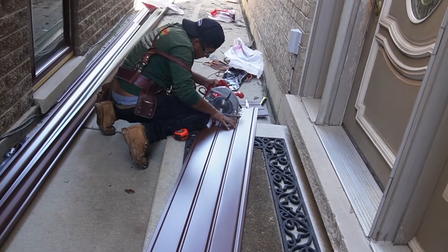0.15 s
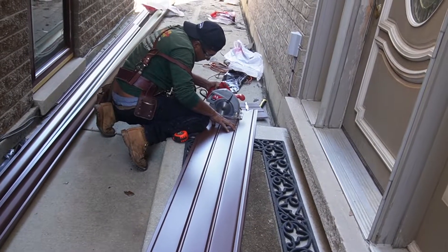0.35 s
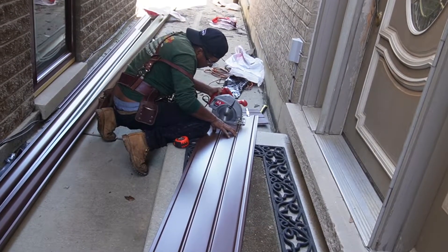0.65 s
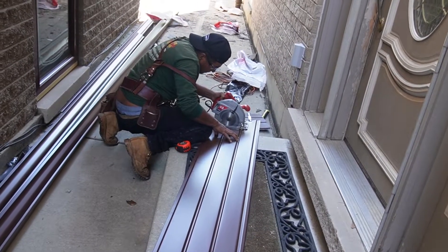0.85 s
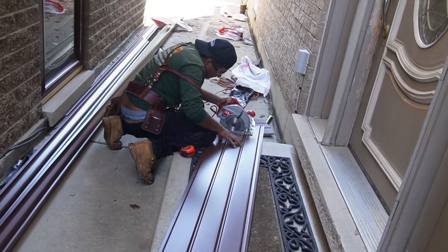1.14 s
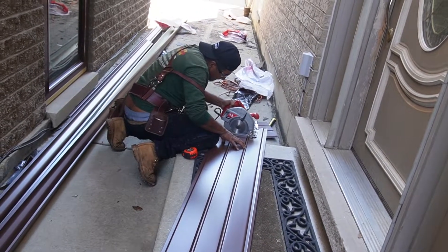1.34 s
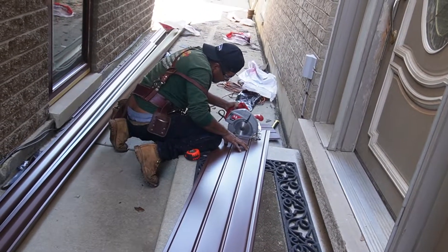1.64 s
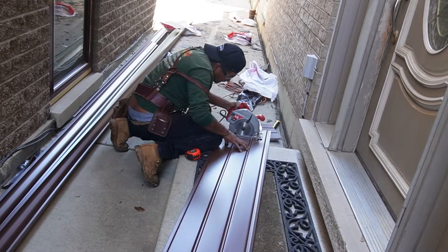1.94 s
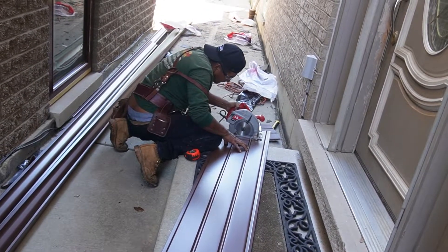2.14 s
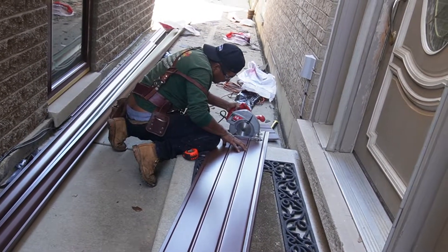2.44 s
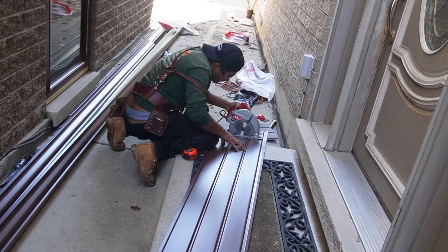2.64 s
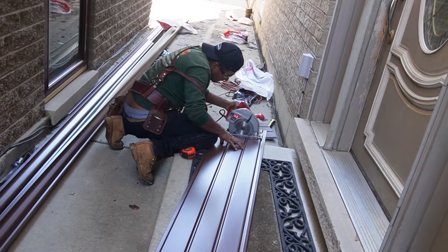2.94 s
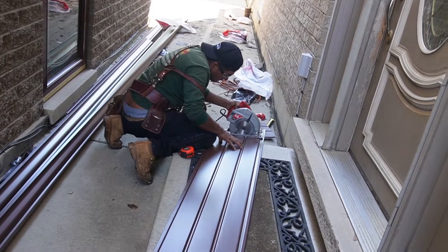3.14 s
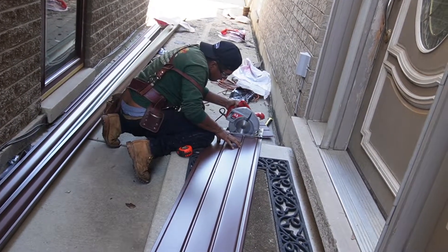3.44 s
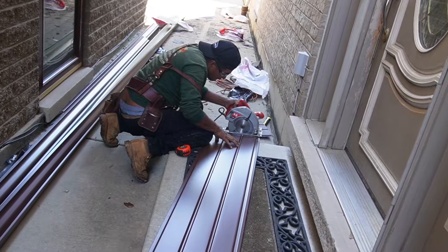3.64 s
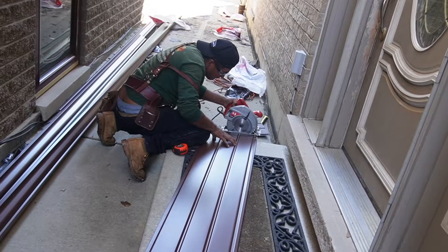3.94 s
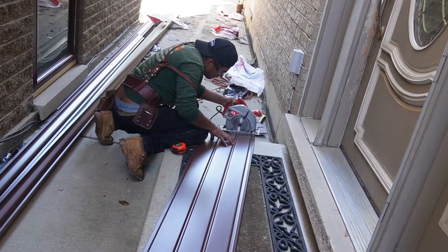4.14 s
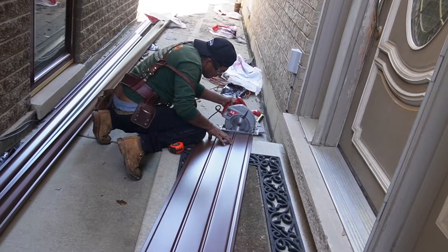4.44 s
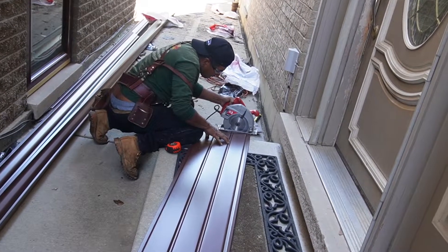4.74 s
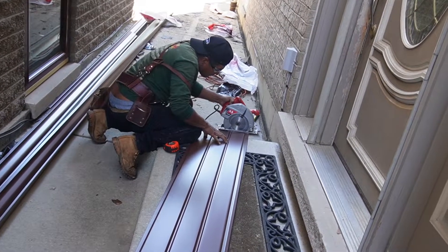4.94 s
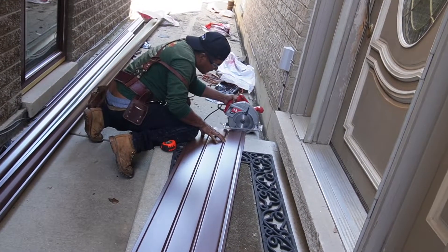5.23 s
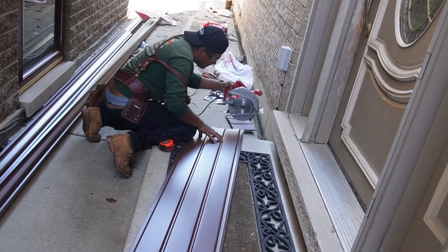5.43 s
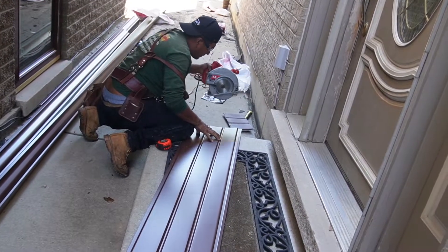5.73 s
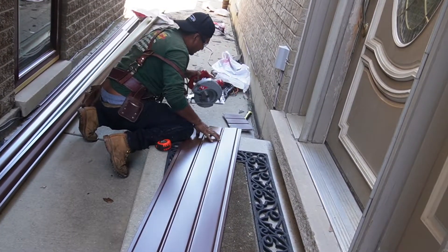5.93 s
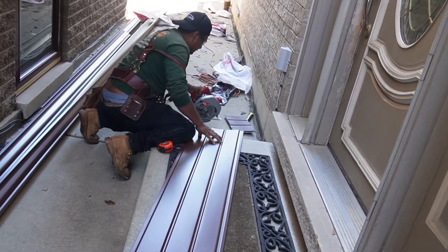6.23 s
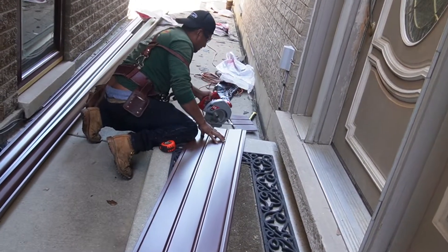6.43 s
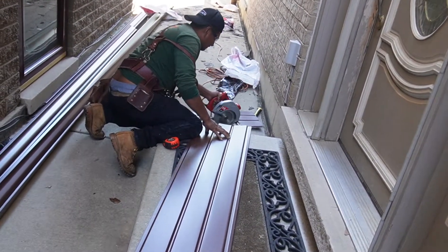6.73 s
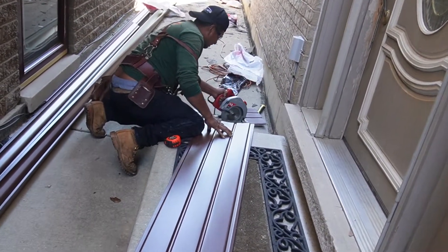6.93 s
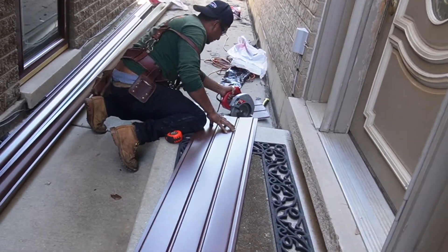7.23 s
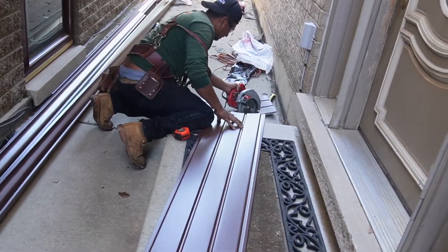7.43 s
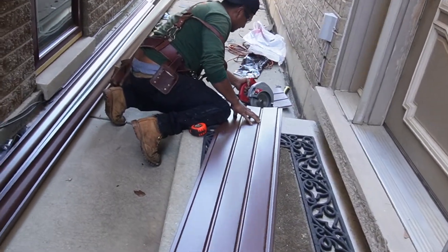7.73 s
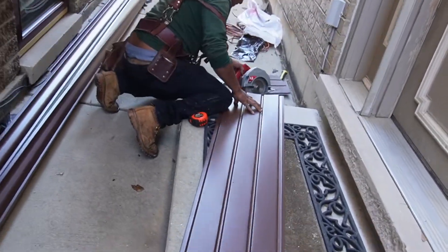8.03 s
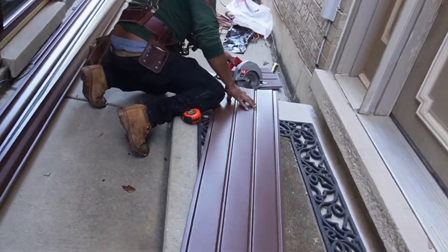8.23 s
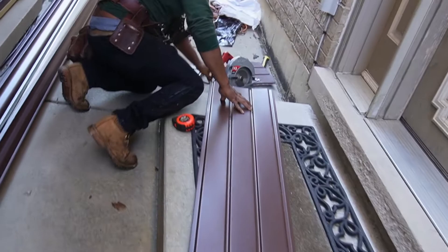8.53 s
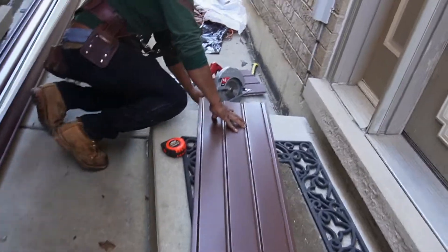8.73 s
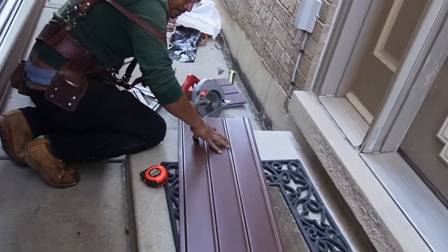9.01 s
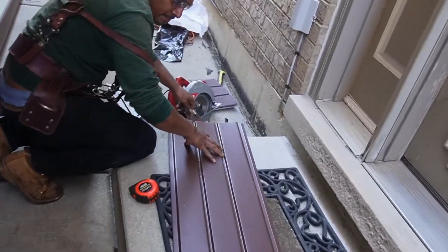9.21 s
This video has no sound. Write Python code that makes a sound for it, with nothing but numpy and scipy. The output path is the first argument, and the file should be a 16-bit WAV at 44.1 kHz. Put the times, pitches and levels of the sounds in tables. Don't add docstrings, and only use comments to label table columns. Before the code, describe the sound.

Close by, between hard brick walls outdoors, a handheld circular saw cuts thin ribbed metal with a piercing whine, bright gritty rasp and wavering squeals. Sharp ticks and rattling slaps cluster midway, and the pitch sags under load. After about five seconds the cut ends and the whine glides smoothly down over rushing fan air, with dull knocks on concrete and small bright clinks.

```python
import sys
import numpy as np
from scipy import signal
from scipy.io import wavfile
from scipy.ndimage import uniform_filter1d

SR = 44100
rng = np.random.default_rng(int(sys.argv[2]) if len(sys.argv) > 2 else 0)


def unload_audio(sound):
    columns = np.transpose(np.atleast_2d(sound))
    steps = np.round(np.clip(columns, -1, 1) * 32767)
    wavfile.write(sys.argv[1], SR, steps.astype(np.int16))


def natural_amplitude(level_db):
    exponent = np.asarray(level_db, float) / 20
    return 10 ** exponent


N = 413207

# [time_s, tooth_rate_hz]
BLADE_SPEED = [(0.0, 4715), (0.1, 4765), (0.7, 4808), (1.6, 4857), (1.95, 4848), (2.3, 4720), (2.45, 4599),
               (2.8, 4592), (3.1, 4442), (3.46, 4400), (3.75, 4565), (4.1, 4662), (4.5, 4657), (4.75, 4627),
               (5.09, 4637), (5.37, 4831)]
# [time_s, tooth_line_db, roughness_0_to_1]
TOOTH_BITE = [(0, -20, 0.7), (.75, -31, 0.8), (1, -23.5, 0.4), (1.9, -18.5, 0.1), (2.25, -15.5, 0.25),
              (2.5, -26.5, .85), (2.65, -16.5, 0.4), (2.95, -32.5, 1.1), (3.09, -14, .7), (3.3, -28, 1.07),
              (3.42, -22, 1), (3.55, -22, 1.1), (3.75, -18.5, 1.04), (4.25, -29, 1.1), (4.42, -20, 1),
              (4.8, -17.5, 0.65), (5, -18.5, 0.9), (5.2, -19, 0.7)]
# [time_s, ratio]
FAN_PULL = [(0, 1.007), (2.3, 1.007), (3.05, 1.011), (3.35, 1.019), (3.65, 1.013), (4, 1.01), (4.4, 1.001),
            (5.05, 1.003), (5.2, 1.007)]
# [time_s, level_db]
FAN_LEVEL = [(0, -20), (.25, -29), (1.42, -25.5), (1.65, -30), (2.6, -36), (3.07, -27), (3.2, -36),
             (3.4, -26), (3.55, -35), (4.7, -31), (5.12, -34), (5.33, -20), (5.68, -25), (6.0, -17.5),
             (7.7, -21), (8.83, -13.5), (8.98, -25), (9.25, -17)]
# [cycles_per_turn, start_s, stop_s]
WOBBLES = [(3, .3, 1), (3, 1.65, 2.3), (6, 0, 2.3), (4, 2.6, 3.65), (1, 2.4, 3.6), (4, 4.2, 4.8),
           (8, 1.7, 5), (4.7, 0, .9)]
WOBBLE_LEVELS = [-56, -50, -51, -45.5, -61, -53, -51.5, -50]
# [pitch_hz, start_s, stop_s,
# once_a_turn_share_0_to_1]
SQUEAL_MODES = [(8660, 0, 2.3, .2), (8830, 0, 1.9, .5), (8860, 3.4, 4.6, .5), (13200, .4, 1.4, .6),
                (4400, .4, 1.9, .9), (2800, 0, .8, .3), (3720, 3.42, 3.6, .3), (1150, 4.86, 4.97, .3),
                (510, 4.85, 4.92, .3), (1380, 8.85, 9.2, .8), (1450, 5.38, 5.46, .3), (15200, 6.3, 8, .5),
                (2250, 7.3, 8.3, .6), (3750, 7.6, 9.37, .6), (5550, 8.6, 9.37, .5), (960, 7.5, 9.1, .5),
                (1980, .5, 1.4, .7), (7450, 4.4, 4.95, .3), (6150, 3.9, 4.45, .3), (5250, .2, 1.3, .6)]
SQUEAL_LEVELS = [-40, -32.5, -27.5, -33, -33, -32, -27, -34, -42, -29.5, -31, -41, -29, -33, -39, -35.5,
                 -34, -38, -37, -38]
# [time_s, rasp_db]
RASP_LEVEL = [(0, -19), (.2, -17.5), (1.24, -16), (1.5, -22.5), (1.67, -18), (2.15, -20.5),
              (2.45, -17.5), (2.76, -24), (2.9, -18), (3.0, -23.5), (3.07, -18.5), (3.7, -19),
              (4.02, -16), (4.37, -16.5), (4.69, -21.5), (4.92, -18), (5.2, -22), (5.3, -42)]
# [pitch_hz, density_db_per_hz]
RASP_SPECTRUM = [(24, -69), (40, -54), (171, -18), (312, -11.5), (354, -25), (402, -7.5), (556, -13.5),
                 (680, -2.5), (2050, -3), (2630, -6.5), (4680, -2), (7930, -4), (9450, -1.5), (16000, -6.5)]
# [pitch_hz, width_hz, level_db]
SHEET_RINGS = [(386, 22, -5), (1980, 1550, -30), (2900, 25, 11), (3200, 320, 3), (3660, 500, 3),
               (4090, 620, -3), (4900, 32, -10), (6580, 67, -14)]
# [start_s, peak_db, centre_hz, t60_s]
GROUND_KNOCKS = [(0.009, -19, 385, 0.39), (1.077, -21.5, 325, 0.42), (3.713, -22.5, 331, 0.37),
                 (4.116, -19, 326, 0.25), (4.536, -18.5, 300, 0.12), (5.027, -19, 433, 0.076),
                 (5.078, -28, 400, 0.083), (6.417, -29.5, 250, 0.89), (7.707, -24, 270, 0.3),
                 (8.223, -19.5, 294, 0.53), (8.769, -18.5, 299, 0.54), (9.268, -23, 159, 0.38),
                 (9.33, -12.5, 473, 0.2)]
# [start_s, peak_db]
SHEET_TICKS = [(1.388, -8), (1.429, -19), (1.516, -10), (1.574, -6), (2.291, 1), (2.419, -1.5),
               (2.543, -17), (2.638, -4), (2.758, -5), (2.787, -5), (2.816, -3.5), (3.193, -6),
               (4.538, -10)]
# [start_s, peak_db]
BRIGHT_CHIPS = [
    (5.4335, -20),
    (8.104, -13),
    (8.2252, -17),
    (9.0694, -18),
]
# [start_s, stop_s, level_db]
CHATTER_RUNS = [
    (1.36, 1.391, -29),
    (1.437, 1.59, -34.5),
    (2.3, 2.381, -29.5),
    (2.458, 2.525, -21.5),
    (2.638, 2.76, -20.5),
    (2.838, 3.008, -15),
    (3.186, 3.36, -26),
    (3.44, 3.555, -32.5),
    (4.531, 4.578, -37),
]
# [pitch_hz, density_db_per_hz]
FAST_SPECTRUM = [(24, -69), (40, -40), (262, -18.5), (329, -23), (455, -18.5), (810, -3), (1180, -9.5),
                 (1480, -3), (1720, -5), (3650, 1), (7000, -5), (8550, -8.5), (16000, -14.5)]
# [pitch_hz, density_db_per_hz]
SLOW_SPECTRUM = [(24, -55), (40, -20.5), (556, -12.5), (770, -15.5), (942, -13.5), (1210, -11),
                 (2150, -2.5), (2700, -5), (3650, -3), (6490, -9.5), (8130, -15), (14500, -20.5),
                 (16000, -43)]
# [pitch_hz, width_hz, level_db]
HOUSING_RINGS = [(910, 510, -20), (1390, 90, 53), (2110, 690, 9), (3720, 51, 18), (5750, 27, -13),
                 (6100, 140, 0), (8150, 610, -3), (8820, 690, 37)]
# [pitch_hz, side_minus_mid_db]
STEREO_WIDTH = [(60, -29), (110, -39), (200, -23), (380, -22), (700, -21.5), (1290, -22), (2380, -15),
                (4400, -10.5), (8120, -4), (15000, 0.5)]

TEETH, FAN_VANES = 70, 12
RELEASE_S, FRICTION_HZ_PER_S, AIR_DRAG_HZ, AIR_DRAG_S = 5.37, 511, 994, 1.453
FAN_FADE_DB, BITE_FADE_DB = 2, 1.5
SIZZLE_FOLLOWS, SQUEAL_FOLLOWS, BODY_FOLLOWS = 0.58, 0.57, 0.87
BODY_SHAKEN_DB = 12
DEEP_CUT_S, DEEP_SIZZLE_DB = 3.3, 3.5
CHATTER_EDGE_S = 0.033
ROAR_DB, ROAR_GAIN_DB, HISS_GAIN_DB, LOW_GAIN_DB = -16.5, 4.5, -1.5, -2.5
SET_DOWN_S, SET_DOWN_LOW_DB, SET_DOWN_HISS_DB = 8.98, 9, 5


def rms_one(x):
    return x / np.sqrt(np.mean(x ** 2) + 1e-20)


def in_time(rows):
    s, *columns = np.transpose(rows)
    return [np.interp(np.arange(N) / SR, s, c) for c in columns]


def gate(start, stop, fade):
    return np.interp(np.arange(N) / SR, [start - fade, start, stop, stop + fade], [0, 1, 1, 0])


def at_hz(points, hz):
    points = np.array(points)
    return np.interp(np.log(hz), np.log(points[:, 0]), points[:, 1])


def steep(x, order, hz, kind):
    return signal.sosfilt(signal.butter(order, hz, kind, fs=SR, output="sos"), x)


def drift(rate_hz, span=slice(None)):
    r = np.exp(-2 * np.pi * rate_hz * 40 / SR)
    slow = signal.lfilter([1], [1, -2 * r, r * r], rng.standard_normal(N // 40 + 2002))[2000:]
    return np.interp(np.arange(N)[span] / 40, np.arange(len(slow)), rms_one(slow))


def ringing(x, peaks, boost_db):
    out = x
    for hz, width, db in peaks:
        r = np.exp(-np.pi * width / SR)
        b = np.array([1, 0, -1]) * (1 - r * r) / 2
        a = [1, -2 * r * np.cos(2 * np.pi * hz / SR), r * r]
        out = out + natural_amplitude(boost_db + 0.11 * db) * signal.lfilter(b, a, x)
    return out


def coloured(pair, band_db, patchy_db, span):
    out, together = np.zeros((2, N)), drift(9, span)
    edges = 32 * 2 ** np.arange(0, 9.4, 1 / 3)
    for k, (low, high) in enumerate(zip(edges, edges[1:])):
        mid, side = steep(pair[:, span], 2, [low, high], "band")
        hz = np.sqrt(low * high)
        flicker_db = patchy_db * (0.5 * together + drift(23, span))
        gain = (-1) ** k * natural_amplitude(band_db(hz)[span] + flicker_db)
        out[:, span] += gain * (mid + natural_amplitude(at_hz(STEREO_WIDTH, hz)) * side * [[1], [-1]])
    return out


def between(hz, centres, curves):
    shares = [np.interp(np.log(hz), np.log(centres), row) for row in np.eye(len(centres))]
    return sum((share * c for share, c in zip(shares, curves) if share), np.zeros(N))


def whine(phase, hz, level_db, flutter_db, span=slice(None)):
    gap = np.arctan(natural_amplitude(at_hz(STEREO_WIDTH, hz))) * (1 + 0.65 * drift(24, span))
    size = np.sqrt(2) * natural_amplitude(level_db + flutter_db * drift(38, span)) / np.cos(np.clip(gap, 0, 0.8))
    return size * np.sin(phase[span] + 0.5 * drift(19, span) + gap * [[1], [-1]])


def spell(phase, hz, level_db, flutter_db, start, stop, fade):
    out = np.zeros((2, N))
    span = slice(max(round((start - fade) * SR), 0), round((stop + fade) * SR))
    out[:, span] = gate(start, stop, fade)[span] * whine(phase, hz, level_db, flutter_db, span)
    return out


def shaking():
    return sum(natural_amplitude(db) * gate(start, stop, CHATTER_EDGE_S) ** 2 for start, stop, db in CHATTER_RUNS)


def cutting():
    return gate(0, 5.2, 0.068)


def tooth_rate():
    free_s = np.maximum(np.arange(N) / SR - RELEASE_S, 0)
    lost = FRICTION_HZ_PER_S * free_s + AIR_DRAG_HZ * (1 - np.exp(-free_s / AIR_DRAG_S))
    return uniform_filter1d(in_time(BLADE_SPEED)[0] - lost, size=4000)


def tooth_whine(rate, turns):
    tooth = 2 * np.pi * TEETH * turns
    second_db, rough = in_time(TOOTH_BITE)
    second_db = second_db + BITE_FADE_DB * drift(4.7)
    rough = np.clip(rough, 0, 1)
    run_out = 1 + 0.28 * np.cos(2 * np.pi * turns) + 0.25 * np.cos(4 * np.pi * turns + 1)
    bite = np.sqrt(1 - rough ** 2) * run_out + rough * drift(260)
    out = cutting() * bite * whine(2 * tooth, 2 * rate, second_db - 0.8, flutter_db=-1)
    return out + spell(3 * tooth, 14500, -33, 2, 1.35, 2.24, fade=0.1)


def fan_whine(rate):
    fan = 2 * np.pi * np.cumsum(rate * in_time(FAN_PULL)[0]) / SR
    ragged, coast = drift(260), 1 - cutting()
    out = whine(fan, rate, in_time(FAN_LEVEL)[0] + FAN_FADE_DB * drift(3.8), flutter_db=3)
    second_db = -24 - 1.3 * rate / 1000 + FAN_FADE_DB * drift(8)
    out += coast * (0.75 + 0.65 * ragged) * whine(2 * fan, 2 * rate, second_db, flutter_db=1.8)
    out += spell(3 * fan, 13500, -43, 4, 5.3, 6.1, fade=0.1)
    out += (0.5 + 0.85 * ragged) * spell(4 * fan, 8500, -33, 4, 8.4, 9.4, fade=0.2)
    return out + coast * whine(fan / FAN_VANES, rate / FAN_VANES, -54, flutter_db=5)


def blade_wobble(turns):
    return sum(spell(2 * np.pi * order * turns, 200, db, 2.5, start, stop, fade=0.079)
               for (order, start, stop), db in zip(WOBBLES, WOBBLE_LEVELS))


def squeals(turns):
    out, t = 0, np.arange(N) / SR
    for (hz, start, stop, jolt), db in zip(SQUEAL_MODES, SQUEAL_LEVELS):
        beat = 1 + jolt * np.cos(2 * np.pi * turns)
        phase = 2 * np.pi * hz * t + 0.9 * drift(63)
        out = out + beat * spell(phase, hz, db, 4.5, start, stop, fade=0.042)
    return out


def rasp(turns):
    level_db = in_time(RASP_LEVEL)[0]
    swing_db = level_db - np.mean(level_db)
    body_db = (BODY_FOLLOWS - 1) * swing_db + BODY_SHAKEN_DB * np.tanh(shaking() / 0.2)
    squeal_db = (SQUEAL_FOLLOWS - 1) * swing_db + 5
    sizzle_db = (SIZZLE_FOLLOWS - 1) * swing_db + DEEP_SIZZLE_DB * gate(DEEP_CUT_S, 6, 0.092)
    patterns = rng.standard_normal((3, 2, 8 * TEETH))
    place = (turns % 1 * patterns.shape[2]).astype(int)
    shares = np.array([drift(1) for p in patterns])
    shares /= np.sqrt(np.sum(shares ** 2, axis=0))
    repeated = sum(share * p[:, place] for share, p in zip(shares, patterns))
    repeated = steep(repeated, 2, 1500, "high")
    chips = rng.standard_normal((2, N)) * natural_amplitude(0.5 * np.minimum(rng.exponential(1, N), 5))
    force = ringing(rms_one(chips) + 0.67 * repeated, SHEET_RINGS, boost_db=-3.5)

    def shape(hz):
        moving_db = between(hz, [1500, 4500, 6800, 9000, 12500], [body_db, 0, 0, squeal_db, sizzle_db])
        return at_hz(RASP_SPECTRUM, hz) + moving_db

    noise = rms_one(coloured(force, shape, patchy_db=1.37, span=slice(0, N * 3 // 5)))
    return gate(0, 5.28, 0.19) * natural_amplitude(level_db + 3) * noise


def burst(s, db, low_hz, high_hz, t60):
    t = np.arange(round(t60 * SR)) / SR
    puff = rng.standard_normal(len(t)) * natural_amplitude(-60 * t / t60)
    puff = steep(puff, 2, [low_hz, high_hz], "band")
    out, at = np.zeros(N + SR), round(s * SR)
    out[at:at + len(t)] = natural_amplitude(db) * puff / np.max(np.abs(puff))
    return out[:N]


def knocks():
    out = sum(burst(s, db, hz / 2.74, hz * 1.68, t60) for s, db, hz, t60 in GROUND_KNOCKS)
    out += sum(burst(s, db, 200, 5500, t60=0.018) for s, db in SHEET_TICKS)
    out += sum(burst(s, db + 7.5, 6600, 12000, t60=0.05) for s, db in BRIGHT_CHIPS)
    return out + 0.021 * (np.roll(out, 45) - np.roll(out, 120)) * [[1], [-1]]


def chatter(turns):
    level = shaking() * natural_amplitude(0.83 * drift(20))
    bunching = 1 + 0.55 * np.cos(2 * np.pi * turns)
    chance = 300 * np.tanh(level / 0.07) * bunching / SR
    force = natural_amplitude(0.81 * np.minimum(rng.exponential(1, N), 2.2)) * rng.choice([1, 1, 1, -1], N)
    slaps = (rng.random(N) < chance) * force
    slaps = steep(slaps, 3, 165, "high")
    slaps = steep(slaps, 2, 5000, "low")
    slaps = ringing(slaps, [(840, 2300, 0)], boost_db=-4.5)
    echo = (np.roll(slaps, 31) - np.roll(slaps, 83)) * 0.069
    rattle = natural_amplitude(-20) * np.sqrt(level / 0.2) * rms_one(slaps + echo * [[1], [-1]])
    return 0.62 * np.tanh(rattle / 0.62)


def coasting(rate):
    slowed = np.clip((4400 - rate) / 2300, 0, 1.1)
    resting = gate(9.44, 9.5, 9.4 - SET_DOWN_S)
    roar_db = ROAR_DB + ROAR_GAIN_DB * slowed - 1.1 * resting
    hiss_db = HISS_GAIN_DB * slowed + SET_DOWN_HISS_DB * resting - 0.3
    low_db = LOW_GAIN_DB * slowed + SET_DOWN_LOW_DB * resting + 2
    air = ringing(rng.standard_normal((2, N)), HOUSING_RINGS, boost_db=-3.5)

    def shape(hz):
        base_db = (1 - slowed) * at_hz(FAST_SPECTRUM, hz) + slowed * at_hz(SLOW_SPECTRUM, hz)
        hump_db = 4 * np.exp(-(np.log(hz / rate / 0.82) / 0.2) ** 2)
        return base_db + hump_db + between(hz, [900, 2500, 7000], [low_db, 0, hiss_db])

    out = coloured(air, shape, patchy_db=0.84, span=slice(N // 2, N)) * gate(5.434, 9.4, 0.33)
    return natural_amplitude(roar_db - 3) * rms_one(out)


def scene():
    rate = tooth_rate()
    turns = np.cumsum(rate) / SR / TEETH
    saw = tooth_whine(rate, turns) + fan_whine(rate) + blade_wobble(turns) + coasting(rate)
    sheet = squeals(turns) + rasp(turns) + chatter(turns)
    return saw + sheet + knocks()


def roll_off(x):
    return signal.sosfilt(signal.butter(12, 16910, fs=SR, output="sos"), x)


def record(dry):
    rounded = dry / (1 + (dry / 0.84) ** 6) ** (1 / 6)
    cut = signal.sosfilt(signal.cheby2(16, 60, 16220, fs=SR, output="sos"), rounded)
    mix = steep(cut, 1, 60, "high")
    return roll_off(mix)


dry = scene()
out = record(dry)
unload_audio(out)
```